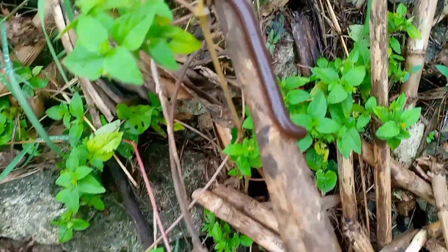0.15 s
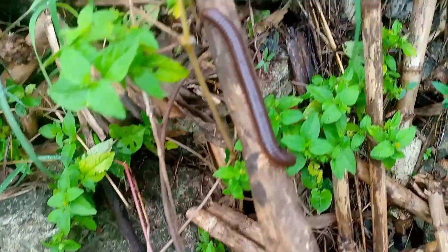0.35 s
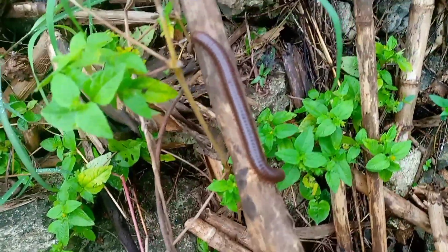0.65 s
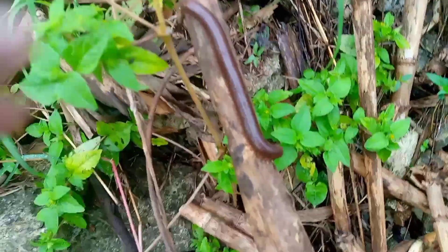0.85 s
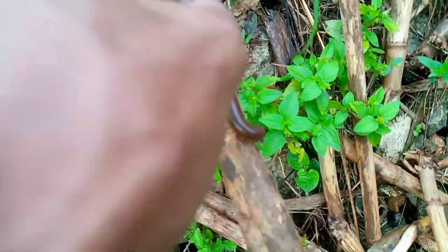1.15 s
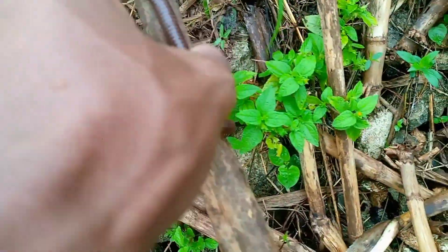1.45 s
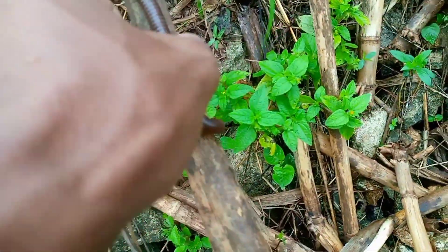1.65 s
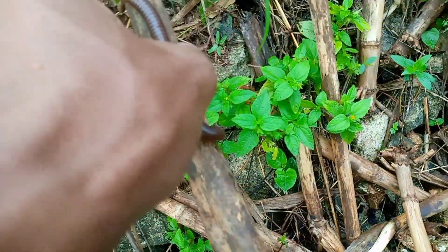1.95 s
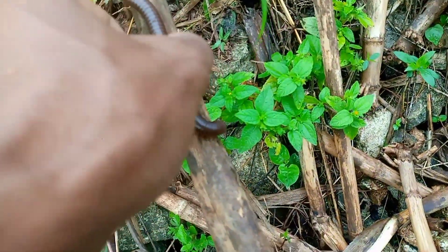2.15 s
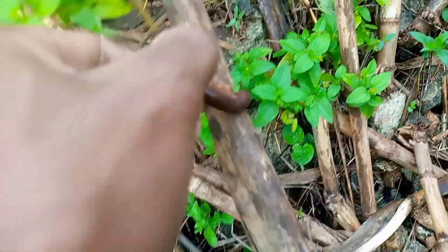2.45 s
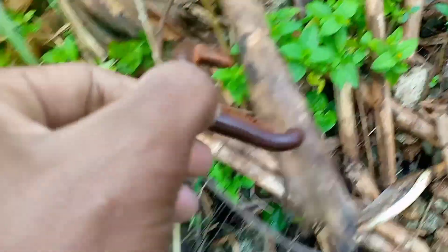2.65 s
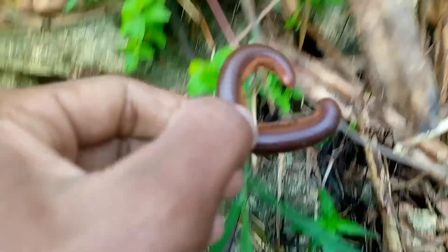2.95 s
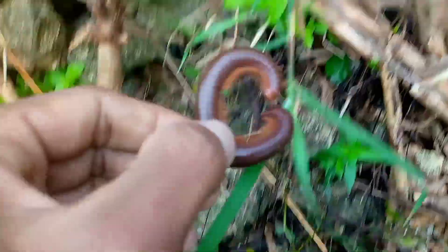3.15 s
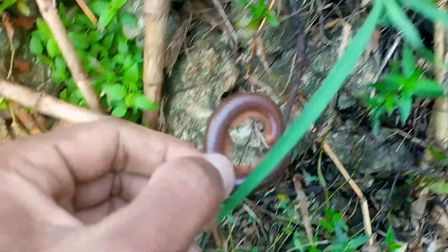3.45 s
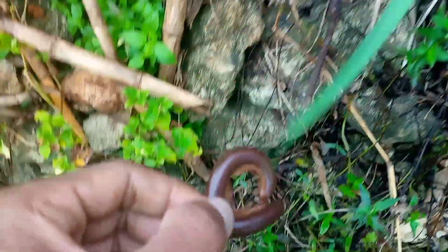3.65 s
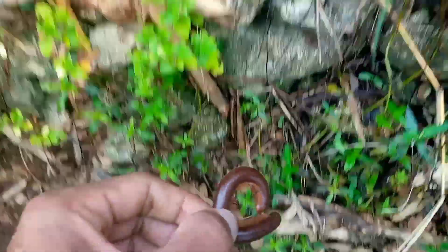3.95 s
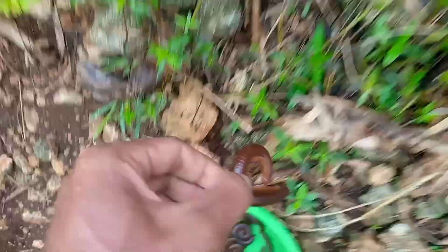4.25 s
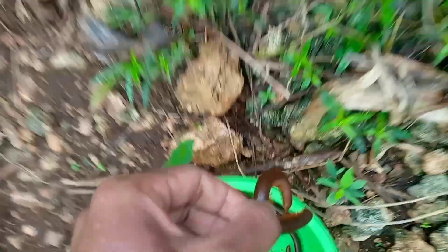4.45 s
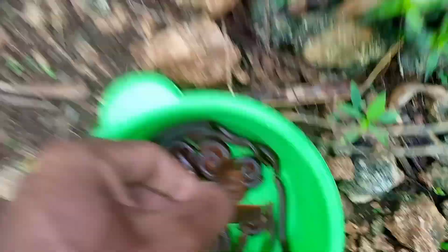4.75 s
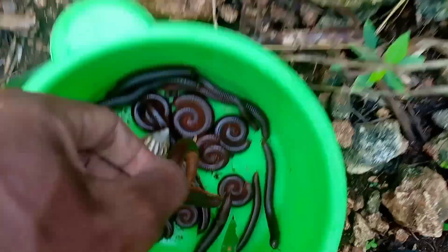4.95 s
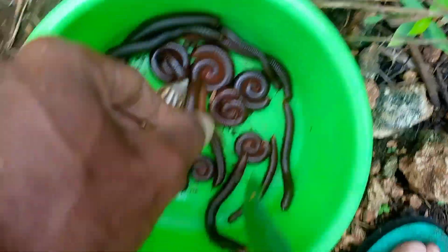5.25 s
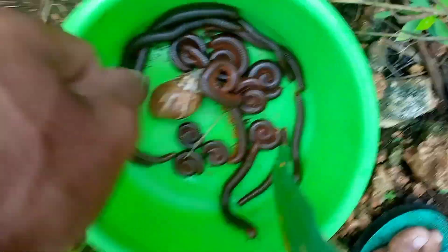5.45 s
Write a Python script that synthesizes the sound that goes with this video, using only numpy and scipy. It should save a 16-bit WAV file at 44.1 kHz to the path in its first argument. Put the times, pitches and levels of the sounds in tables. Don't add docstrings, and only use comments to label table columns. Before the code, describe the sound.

An outdoor close-up on a phone microphone, with faint low traffic rumble and a thin high insect buzz throughout. From 0 to 1.5 s dry leaves rustle lightly with scattered crisp ticks and small cracks, while a chick-like bird gives a short rising chirp every third of a second, lasting until about 4.1 s. From 1.5 to 4 s the litter is sparser: isolated snaps, a near cricket tone at 1.5-2 s, thin distant whistles, and soft hoots clustering around 3.2-3.7 s. A short bump on the phone comes at 2.85 s. From 4.25 s rustling swells, with rough scrapes densest at 4.7-4.85 s, then hard, bright crunches at 4.9-5.17 s. After a tiny lull, a hard object strikes a plastic bucket at 5.32 s, bounces at 5.37 s with a short dry rattle, and small scrapes and a dull knock follow until 5.6 s.

```python
import sys
import numpy as np
from scipy import signal
from scipy.fft import rfft, irfft, next_fast_len
from scipy.io import wavfile
from scipy.ndimage import uniform_filter1d, map_coordinates

SR = 44100
rng = np.random.default_rng(int(sys.argv[2]) if len(sys.argv) > 2 else 0)


def transcribe(signal):
    frames = np.atleast_2d(signal).T
    limited = np.clip(frames, -1, 1)
    pcm = np.round(limited * 32767).astype(np.int16)
    wavfile.write(sys.argv[1], SR, pcm)


def gain_from_db(level_db):
    decades = np.asarray(level_db, float) / 20
    return 10 ** decades


N = 247842

# pitch_hz, level_db [dB per Hz]
CRISP = [(2530, -47.5), (4300, -4.5), (4570, -3.5), (5390, -1.5), (6350, -1), (6860, 3.5), (8140, -8.5),
         (8740, -11), (10500, -21), (13600, -15.5), (14400, -9), (15100, -8), (16000, 0)]
# pitch_hz, level_db [dB per Hz]
LEAF = [(760, -40.5), (1300, -15), (1470, -26), (1840, -7), (2010, -3), (2180, -2), (2950, -2),
        (4300, -4.5), (5590, -45.5), (9460, -120)]
# pitch_hz, level_db [dB per Hz]
TWIG = [(150, -84), (250, -15), (389, -13), (670, -0.5), (777, 1), (1600, -3.5), (2080, -9), (3520, -120)]
BODIES = (CRISP, LEAF, TWIG)


def unit(x):
    return x / np.sqrt(np.mean(x ** 2) + 1e-20)


def along(points, hz):
    f, v = np.transpose(points)
    return np.interp(np.log(hz + 1), np.log(f + 1), v)


def curve(rows):
    s, value = np.transpose(rows)
    return np.interp(np.arange(N) / SR, s, value)


def wobble(rate):
    coarse = np.arange(0, N + 16, 16)
    knots = map_coordinates(rng.standard_normal(int(N * rate / SR) + 4), [coarse * rate / SR])
    return np.interp(np.arange(N), coarse, knots)


def coloured(x, spectrum):
    size = 4096
    cep = irfft(np.log(gain_from_db(along(spectrum, np.fft.rfftfreq(size, 1 / SR))) + 1e-5))
    cep[1:size // 2] *= 2
    cep[size // 2 + 1:] = 0
    h = irfft(np.exp(rfft(cep)))
    return signal.fftconvolve(x, h / np.linalg.norm(h))[:N]


def patchy(depth_db):
    z = signal.stft(rng.standard_normal(N), nperseg=384)[2]
    field = uniform_filter1d(rng.standard_normal(z.shape), size=2, axis=0)
    field = uniform_filter1d(field, size=16, axis=1)
    return unit(signal.istft(z * gain_from_db(depth_db * unit(field)), nperseg=384)[1][:N])


def add(into, s, x):
    part = into[max(round(s * SR), 0):][:len(x)]
    part += x[:len(part)]


def echoed(x, wet_db):
    # pitch_hz, t60_s
    tree_decay = [(500, 0.16), (3000, 0.16), (6000, 0.26)]
    hz, t, z = signal.stft(rng.standard_normal(SR // 4), SR, nperseg=128)
    fade = gain_from_db(-60 * t / along(tree_decay, hz)[:, None])
    tail = signal.istft(z * fade, SR, nperseg=128)[1]
    echo = signal.fftconvolve(x, tail / np.linalg.norm(tail))
    return np.pad(x, (0, len(tail) - 1)) + gain_from_db(wet_db) * echo


def note(hz, level):
    return np.sqrt(2) * level * np.sin(2 * np.pi * np.cumsum(hz) / SR)


def traffic():
    # time_s, level_db
    rumble_level = [(0.0, -58.5), (.85, -56), (1.55, -52), (2.3, -57), (2.9, -52), (3.5, -54), (4.05, -55),
                    (4.28, -52), (4.45, -55), (4.72, -54), (4.85, -55), (5.17, -50.5), (5.25, -50),
                    (5.62, -50.5)]
    # pitch_hz, level_db
    rumble_colour = [(12, -66), (20, -22), (27, -27.5), (81, 1.5), (180, -15.5), (273, -23.5), (304, -23.5),
                     (431, -28.5), (500, -32), (650, -33.5), (1100, -120)]
    lumps = unit(gain_from_db(2.5 * wobble(12) + 1.5 * wobble(5)) * rng.standard_normal(N))
    return gain_from_db(curve(rumble_level)) * coloured(lumps, rumble_colour)


def insects():
    # time_s, level_db
    choir_level = [(0.0, -49), (.3, -51.5), (.9, -50), (1.42, -51.5), (1.57, -54), (1.75, -51),
                   (2.33, -60.5), (2.6, -58.5), (2.9, -53), (3.54, -58), (3.91, -56.5), (4.3, -50.5),
                   (4.65, -48), (4.8, -54), (4.93, -55), (5.3, -45.5), (5.62, -41.5)]
    # pitch_hz, level_db
    choir_colour = [(3650, -30.5), (6200, -19), (6610, -18.5), (6730, -14.5), (6930, -5.5), (7170, -8.5),
                    (7310, -7.5), (7650, -17), (7800, -27), (10100, -37), (17200, -120)]
    # pitch_hz, level_db
    hiss_colour = [(4710, -1), (8000, -21), (8910, -17), (11400, -9), (13900, -10), (15100, 4),
                   (16000, -15)]
    buzz = unit(gain_from_db(1.8 * wobble(45) + 0.8 * wobble(8)) * patchy(depth_db=1))
    choir = gain_from_db(curve(choir_level) - 5.0) * coloured(buzz, choir_colour)
    hiss = gain_from_db(-70.5) * coloured(rng.standard_normal(N), hiss_colour)
    on_s, off_s, fade_s = 1.54, 1.998, 0.18
    loud_db, soft_db = -58, -94.5
    near_db = np.interp(np.arange(N) / SR, [on_s - fade_s, on_s, off_s, off_s + fade_s],
                        [soft_db, loud_db, loud_db, soft_db])
    cricket = note(6950 + 40 * wobble(120), gain_from_db(near_db + 1.7 * wobble(45.1)))
    return choir + hiss + cricket


def far_birds():
    # start_s, length_s, from_hz, to_hz, level_db
    whistles = [(0.06, 0.099, 2140, 2310, -68), (0.453, 0.081, 1265, 1410, -65),
                (1.555, 0.21, 4610, 4100, -63), (1.888, 0.15, 5040, 4794, -55.5),
                (1.9, 0.18, 5090, 4970, -61.5), (1.91, 0.14, 5270, 5440, -66),
                (3.16, 0.055, 4323, 4210, -49.5), (3.2, 0.16, 1238, 1142, -62),
                (3.25, 0.11, 4333, 4046, -53), (3.679, 0.045, 4880, 4650, -52),
                (4.148, 0.12, 4200, 4070, -60), (2.775, 0.067, 1180, 1160, -70)]
    # start_s, level_db, pitch_hz, length_s
    hoots = [(0.817, -58, 586, 0.035), (1.475, -65, 580, 0.031), (1.571, -59, 580, 0.025),
             (1.679, -68, 610, 0.045), (1.764, -69, 627, 0.078), (1.944, -67.5, 423, 0.04),
             (2.069, -66, 419, 0.086), (2.12, -72, 630, 0.098), (3.174, -55, 898, 0.05),
             (3.342, -53.5, 930, 0.015), (3.41, -49.5, 910, 0.024), (3.492, -45, 911, 0.014),
             (3.591, -45.5, 898, 0.018), (3.678, -61, 996, 0.015)]
    out = np.zeros(N)
    waver, flutter = wobble(98), wobble(90)
    for s, length, from_hz, to_hz, db in whistles:
        t = np.arange(0, length, 1 / SR)
        start = round(s * SR)
        now = slice(start, start + len(t))
        edge = np.clip(np.minimum(t, length - t) / 0.015, 0, 1)
        glide = from_hz + (to_hz - from_hz) * t / length
        bend = 1 + 0.0336 * (edge - 1) + 0.0053 * waver[now]
        level = edge * gain_from_db(db - 3.5 + 2.8 * flutter[now])
        add(out, s, echoed(note(glide * bend, level), wet_db=-0.5))
    for s, db, hz, length in hoots:
        t = np.arange(0, length, 1 / SR)
        shape = np.sin(np.pi * (t / length) ** 0.6)
        hoot = note(hz * (1 + 0.064 * t / length), shape * gain_from_db(db - 0.5))
        add(out, s - 0.004, echoed(hoot, wet_db=2.0))
    return out


def chirps():
    # start_s, top_hz, level_db, held_note_db (relative), hold_s
    chirp_events = [(0.169, 4790, -51.5, -13.5, 0.1), (0.486, 4700, -49, -15, 0.1),
                    (0.812, 4780, -48, -14, 0.036), (1.136, 4600, -47.5, -10.5, .1),
                    (1.446, 4735, -53.5, -1.5, 0.075), (1.744, 4680, -49, -2, 0.085),
                    (2.065, 4650, -48, -2.5, 0.046), (2.386, 4816, -42.5, -12.5, 0.065),
                    (2.684, 4916, -46, -11, 0.11), (3.017, 4810, -46.5, -17.5, 0.059),
                    (3.358, 4850, -46.5, -18, 0.18), (3.684, 4680, -46.5, -10, 0.1),
                    (4.026, 4600, -48, -19, .043)]
    head_turns = [-4, -17, 1, -15, 1, -16, -4, -2, -4, 4.5, 6, -7, -9]
    lead_in, rise, low_hz = 0.017, 0.036, 2300
    out = np.zeros(N)
    flutter, waver = wobble(170), wobble(120)
    for (s, top_hz, late_db, below_db, hold), turn_db in zip(chirp_events, head_turns):
        early_db, hold_db = late_db + turn_db, late_db + below_db
        s -= lead_in
        t = np.arange(round((lead_in + rise + hold + 0.02) * SR)) / SR - lead_in
        start = round(s * SR)
        now = slice(start, start + len(t))
        climb = np.sin(np.pi / 2 * np.clip(t / (1.25 * rise), 0, 1) ** (1 / 0.88))
        hz = low_hz + (top_hz - low_hz) * climb + 35 * waver[now]
        end = rise + hold
        times = [-lead_in, 0.15 * rise, 0.35 * rise, 0.54 * rise, 1.29 * rise, end, end + 0.011]
        levels = [late_db - 27.5, late_db - 20, early_db, late_db, hold_db, hold_db - 14.0, hold_db - 70]
        db = np.interp(t, times, levels)
        add(out, s, echoed(note(hz, gain_from_db(db + 2.4 * flutter[now])), wet_db=6.5))
    return out


def thumps():
    # start_s, level_db, pitch_hz
    thump_events = [(2.8465, -23, 735), (2.86, -35, 776), (2.94, -42, 94), (3.15, -39, 85), (4.2, -37, 78),
                    (4.26, -36, 80), (4.32, -38, 75), (2.866, -33.5, 86), (5.425, -34.5, 93), (5.576, -33, 152)]
    out, t = np.zeros(N), np.arange(SR // 10) / SR
    for s, db, hz in thump_events:
        shape = gain_from_db(db - 26 * t * hz / 3.66) * (1 - np.exp(-t / 0.00034))
        add(out, s, shape * np.sin(2 * np.pi * hz * t))
    return out


def bucket():
    # start_s, level_db, brightness_db
    knocks = [
        (5.3183, 6.5, 4.5),
        (5.369, -7.5, 3),
        (5.383, -17, 5),
        (5.488, -15.5, 0),
    ]
    # pitch_hz, level_db, t60_s
    modes = [(620, 5, 0.02), (1160, -3, 0.023), (1892, -2, 0.025), (2320, 10, .008), (2700, 3, 0.0083),
             (2920, -6, 0.013), (3774, -14, 0.024), (4640, -14, 0.023), (480, -18, 0.031), (887, -8, .02)]
    out, t = np.zeros(N), np.arange(SR // 8) / SR
    for s, db, bright_db in knocks:
        ring = np.zeros(len(t))
        for hz, level, t60 in modes:
            lift_db = bright_db if hz > 1500 else 3
            ring += gain_from_db(level + lift_db - 60 * t / t60) * np.sin(2 * np.pi * hz * t)
        onset = 1 - np.exp(-t / 0.0006)
        add(out, s + 0.00177, -gain_from_db(db - 15.5) * ring * onset)
    out = signal.sosfilt(signal.butter(2, 310, 'high', fs=SR, output='sos'), out)
    rattle = rng.standard_normal(SR // 8) * gain_from_db(-60 * t / 0.12)
    return out + gain_from_db(-11.5) * signal.fftconvolve(out, rattle / np.linalg.norm(rattle))[:N]


def stirring():
    # start_s, length_s, level_db, weight_db (heavier strokes stir leaves and twigs)
    strokes = [(0.0, 0.56, -50.5, -30), (0.321, 0.032, -42, -20), (0.452, 0.08, -45.5, -20),
               (0.541, 0.095, -45, -16), (0.694, 0.07, -44, -16.5), (0.768, 0.22, -48.5, -13),
               (1.09, 0.088, -53, -14), (1.193, 0.051, -45, -12), (1.337, 0.067, -53, -13),
               (1.423, 0.063, -52, -7), (2.036, 0.2, -58, -10), (2.442, 0.11, -70.5, 11),
               (2.697, 0.193, -81, 14), (3.035, 0.17, -73.5, 8), (3.298, 0.23, -65.5, -7),
               (3.741, 0.099, -64.5, 1.5), (4.026, 0.18, -59, -2.5), (1.607, 0.085, -60, -11),
               (3.523, 0.042, -59.5, -9)]
    # start_s, length_s, level_db, weight_db, wood_db
    handfuls = [(4.265, 0.092, -44.5, -10.5, -13.5), (4.345, 0.041, -34, -7.5, -13.5),
                (4.442, .12, -34, -9, -18), (4.575, 0.053, -35, -10, -17), (4.64, 0.1, -31.5, -3, -15),
                (4.725, 0.078, -29, -5, -19.5), (4.81, 0.048, -30.5, 0.5, -22.5),
                (4.865, 0.094, -40, 2, -17), (4.972, 0.12, -35, 0.5, -22), (5.09, 0.12, -42, -5.5, -42),
                (5.214, 0.14, -56, -5, -24), (5.341, 0.084, -46, 6, 3), (5.407, 0.064, -42.5, 3, 0.5),
                (5.295, 0.03, -48, -1, -9), (5.503, 0.024, -42, 1.5, -18), (5.569, 0.043, -41, -1.5, -9.5)]
    rest_db = (-75, -73.5, -76.5)
    t = np.arange(SR // 2) / SR
    power = np.outer(gain_from_db(rest_db) ** 2, np.ones(N))
    light = [(*row, -8.5 + 1.28 * row[-1], 0.032) for row in strokes]
    heavy = [(*row, 0.15) for row in handfuls]
    for s, length, db, weight_db, wood_db, t60 in light + heavy:
        swell = np.clip(t / 0.013, 0, 1) ** 2
        loss_db = 2 * np.clip(t / length, 0, 1) + 60 * np.maximum(t - length, 0) / t60
        shape = (swell * gain_from_db(-loss_db)) ** 2
        for body, rel_db in zip(power, (0, weight_db, wood_db)):
            add(body, s, gain_from_db(db + rel_db) ** 2 * shape)
    return np.sqrt(power)


def grains(count, cycles):
    when, size, tone = rng.random((count, 3)).T
    hz = 500 * 30 ** tone
    t = np.arange(256) / SR
    level = gain_from_db(-3 * np.log(size + 0.061)) * np.sqrt(hz)
    rings = level[:, None] * np.exp(-np.outer(hz / cycles, t)) * np.sin(2 * np.pi * np.outer(hz, t))
    at = (when * N).astype(int)[:, None] + np.arange(len(t))
    return unit(np.bincount(at.ravel(), rings.ravel())[:N])


def rustle():
    clumps = gain_from_db(1.6 * wobble(35) + 2.7 * wobble(140))
    cracks = grains(count=9000, cycles=6.0)
    out = np.zeros(N)
    for level, body in zip(stirring(), BODIES):
        rub = unit(clumps * (patchy(depth_db=4.5) + 0.45 * cracks))
        out += level * unit(coloured(rub, body))
    return out


def scrapes():
    # start_s, length_s, level_db, ring_hz, second_ring_hz
    scrape_events = [(2.19, 0.022, -45, 5800, 11500), (4.96, 0.0043, -30, 7500, 5800),
                     (5.605, 0.0063, -39.5, 6300, 2300), (0.184, 0.0064, -38, 4100, 7700),
                     (4.4, 0.055, -63, 3100, 6300), (2.978, 0.017, -55.5, 5300, 6700),
                     (0.331, 0.024, -46.5, 6600, 1930), (0.816, 0.024, -48, 6400, 6600),
                     (1.38, 0.0084, -49, 6500, 6400), (1.215, 0.039, -54, 7700, 2580),
                     (0.51, 0.021, -47, 8000, 4200), (4.66, 0.052, -33, 7560, 3850),
                     (4.717, 0.0084, -24.5, 5300, 8900), (4.7275, 0.014, -21, 5240, 2200),
                     (4.743, 0.013, -19.5, 6560, 2000), (4.769, 0.015, -25, 6700, 2120),
                     (4.778, 0.0094, -29, 6500, 2270), (4.795, 0.0091, -24, 3200, 8400),
                     (4.821, 0.0034, -35, 1900, 2900), (4.828, 0.012, -32, 6500, 2600),
                     (4.843, 0.014, -32, 6100, 2850), (4.993, 0.013, -28.5, 6300, 6100),
                     (5.014, 0.0039, -29, 2700, 5100), (5.078, 0.015, -34.5, 5400, 5200),
                     (5.155, 0.024, -35.5, 7000, 3140), (5.164, 0.0078, -25, 6300, 5600),
                     (5.173, 0.006, -33, 6650, 11600), (5.14, 0.097, -52, 4400, 3400),
                     (5.183, 0.013, -39.5, 6200, 5600), (5.213, 0.014, -41.5, 4900, 5800),
                     (5.519, 0.014, -27, 7200, 13800), (5.387, 0.008, -28.5, 1860, 620),
                     (5.436, 0.0078, -32, 1860, 670), (5.472, 0.003, -50, 3020, 1030),
                     (5.518, 0.028, -41.5, 2800, 7100)]
    sharpness = 13
    t, drive, rings = np.arange(SR // 12) / SR, np.zeros(N), np.zeros(N)
    rough = gain_from_db(2.2 * wobble(500))
    for s, length, db, hz, second_hz in scrape_events:
        rise = np.clip(t / 0.0025, 0, 1)
        hold = 0.5 + np.sin(np.pi * np.clip(t / length, 0, 1)) / 2
        fade = gain_from_db(db - 60 * np.maximum(t - length, 0) / 0.012)
        burst = rng.standard_normal(len(t)) * rise * hold * fade
        add(drive, s, burst)
        for ring_hz, ring_db in ((hz, 0), (second_hz, -12.5)):
            gain = gain_from_db(ring_db) * np.sqrt(sharpness * SR / ring_hz / np.pi)
            add(rings, s, gain * signal.lfilter(*signal.iirpeak(ring_hz, sharpness, SR), burst))
    litter = sum(gain_from_db(db) * coloured(drive, body) for db, body in zip((-9, -9.5, -27), BODIES))
    return rough * (rings + litter)


def pops():
    # start_s, level_db, pitch_hz, t60_s
    pop_events = [(0.4824, -34, 7100, 0.0067), (0.4856, -31, 7400, .005), (0.4974, -29.5, 9400, .003),
                  (.5688, -31, 15200, 0.0032), (.6192, -25, 6500, .004), (.4465, -36, 7600, .005),
                  (5.348, -24, 2000, .006), (5.353, -24, 2050, .008), (5.4704, -30, 3080, .008),
                  (0.687, -37, 7450, .008), (0.7455, -33, 7060, .01), (0.79, -40, 6800, .006),
                  (.543, -41, 9500, .003), (1.022, -38, 6500, .01), (1.3404, -44, 6800, .006),
                  (1.348, -50, 8900, .004), (1.362, -44, 9000, 0.0045), (1.478, -52, 11000, 0.0025),
                  (2.0653, -36.5, 5770, .005), (2.128, -52, 10000, 0.0026), (2.2229, -36, 5550, 0.0053),
                  (2.222, -42.5, 9400, .008), (2.2394, -46, 7230, .004), (2.881, -45.5, 2570, .006),
                  (2.9092, -45, 6280, .008), (3.1625, -47, 900, 0.0073), (3.261, -38, 14000, .003),
                  (3.5225, -47, 14500, .003), (3.579, -44, 15000, .003), (3.683, -47, 8000, .003),
                  (3.8243, -36.5, 5590, .006), (3.9865, -39.5, 8571, 0.021), (4.301, -27.5, 6890, 0.0072),
                  (4.823, -30, 2920, 0.0093), (5.028, -22, 2900, .004), (5.0359, -14, 2830, 0.014),
                  (5.0362, -23, 7000, 0.011), (4.9892, -21.5, 2800, 0.014), (5.137, -27, 4900, 0.016),
                  (4.641, -26, 6400, 0.0078), (5.1714, -24, 7100, 0.02), (5.1695, -38, 10800, 0.01),
                  (5.324, -11, 1910, 0.0045), (5.3704, -9, 1900, .005), (5.388, -13.5, 3250, 0.0044),
                  (5.071, -34, 12200, 0.0023), (5.3323, -26, 8340, .012)]
    out, t = np.zeros(N), np.arange(SR // 40) / SR
    for s, db, hz, t60 in pop_events:
        shape = gain_from_db(db - 60 * t / max(t60, 0.002)) * (1 - np.exp(-t * hz * 3))
        add(out, s, shape * np.sin(2 * np.pi * hz * t))
    return out


def snaps():
    # start_s, level_db, t60_s, ring_hz
    ticks = [(0.1464, -34, 0.019, 7100), (.446, -35.5, 0.055, 7400), (.568, -38, 0.028, 7900),
             (.687, -33.5, 0.033, 7100), (.7265, -29, 0.017, 6600), (1.0228, -34, 0.027, 6700),
             (1.3402, -32, 0.072, 6730), (2.2216, -30, 0.026, 5700), (3.182, -36, 0.04, 6400),
             (3.26, -43, 0.039, 4290), (3.26, -40.5, 0.014, 11900), (3.2909, -42, 0.018, 15400),
             (3.6077, -38, 0.013, 15700), (3.608, -35.5, 0.02, 2040), (4.2614, -27.5, 0.023, 7300),
             (4.2916, -28.5, 0.026, 7160), (4.4884, -27, 0.028, 3558), (4.4612, -34, .02, 6940),
             (4.6403, -23, 0.1, 6695), (4.958, -31, 0.06, 5900), (5.1365, -8, 0.0059, 5120),
             (5.4992, -27, 0.022, 7170), (3.668, -36.5, 0.031, 7600)]
    leaf_cracks = [(0.187, -28, 0.015, 3850), (.2492, -33.5, 0.027, 7200), (.6193, -29, 0.012, 7000),
                   (.9078, -30.5, 0.039, 7300), (1.192, -37.5, 0.055, 7350), (5.606, -22, 0.023, 2200),
                   (2.3401, -35, 0.039, 5220), (2.5376, -37.5, 0.055, 2700), (3.8243, -38.5, 0.064, 5860),
                   (3.985, -27, 0.035, 5960), (4.1084, -26, 0.072, 2780), (4.1854, -31, 0.012, 6200),
                   (4.8524, -22, 0.0097, 2880), (5.3314, -12.5, 0.019, 6946), (5.3404, -9.5, 0.016, 2060)]
    crunches = [(0.1494, -36.5, 0.15, 2230), (.381, -34.5, 0.029, 7160), (.8994, -38, 0.15, 2240),
                (2.065, -47, 0.013, 3420), (2.2845, -34.5, 0.029, 2160), (2.2845, -34, 0.019, 6440),
                (3.5782, -37, 0.039, 3060), (4.37, -23.5, 0.059, 7300), (4.4503, -34, 0.011, 6360),
                (4.9195, -12.5, 0.0073, 3570), (4.9886, -6.5, 0.014, 2700), (5.0355, -4.5, 0.013, 2730),
                (5.069, -8, 0.018, 6730)]
    twig_snaps = [(0.7886, -41.5, 0.035, 6740), (2.8453, -43, 0.14, 6700), (3.1842, -54, 0.022, 4290),
                  (3.5214, -44, 0.032, 1720), (3.6654, -38.5, 0.058, 1950), (5.3198, -8.5, 0.027, 1810),
                  (5.3709, -15, .012, 1790), (5.5897, -29.5, 0.056, 5440)]
    drags = [(4.059, -13, 0.054, 6430), (4.353, -22, 0.07, 6900), (3, -38, 0.061, 5600),
             (0.42, -38, 0.044, 7600)]
    clicks = [(.4815, -28, .008, 7400), (.4855, -28.5, 0.019, 7060), (.498, -33, 0.0073, 9800),
              (.6195, -22, 0.0032, 4900), (.976, -44, 0.0086, 12000), (1.107, -41, .012, 8540),
              (1.44, -38, .012, 7500), (1.462, -52, 0.0087, 8900), (1.478, -48, 0.0089, 8500),
              (5.253, -45, .006, 8900), (2.02, -34, 0.0058, 5440), (2.994, -31, 0.0058, 3100),
              (5.3875, -26, 0.003, 3250), (4.641, -20.5, 0.031, 6360), (5.0695, -29, 0.011, 6840)]
    # crisp_db, leaf_db, twig_db, swell (share of the decay time)
    kinds = [(ticks, -5, -17, -47, 0.069), (leaf_cracks, -0.5, -9.5, -8, 0.084),
             (crunches, -5, -6.5, -17, 0.087), (twig_snaps, -7, -13.5, 6, 0.046),
             (drags, -2.5, -9, -27, 0.18), (clicks, -10, -14.5, -31, 0.049)]
    t, drive, rings = np.arange(SR // 10) / SR, np.zeros((3, N)), np.zeros(N)
    for rows, crisp_db, leaf_db, twig_db, swell in kinds:
        for s, db, t60, hz in rows:
            t60 = max(t60, 0.004)
            shape = gain_from_db(-60 * t / t60) * (1 - np.exp(-t / (swell * t60))) ** 2
            burst = rng.standard_normal(len(t)) * shape
            burst *= np.linalg.norm(shape) / np.linalg.norm(burst)
            for body_drive, rel_db in zip(drive, (crisp_db, leaf_db, twig_db - 15.5)):
                add(body_drive, s - 0.001, gain_from_db(db + rel_db) * burst)
            ring = signal.lfilter(*signal.iirpeak(hz, 14, SR), burst)
            add(rings, s - 0.001, gain_from_db(db + 11.5) * ring)
    return rings + sum(coloured(body_drive, body) for body_drive, body in zip(drive, BODIES))


def scene():
    background = traffic() + insects() + far_birds() + chirps()
    breaks = echoed(snaps() + scrapes() + pops(), wet_db=-15)[:N]
    return (background + thumps() + bucket() + rustle() + breaks)[None]


def top_cut(x):
    return signal.sosfilt(signal.butter(12, 17160, fs=SR, output="sos"), x)


def record(dry):
    size = next_fast_len(N)
    passed = np.fft.rfftfreq(size, 1 / SR) < 15780
    x = irfft(rfft(dry, size) * passed, size)[:, :N]
    x = x / (1 + np.abs(x) ** 20) ** (1 / 20)
    return top_cut(x)


dry = scene()
out = record(dry)
transcribe(out)
```